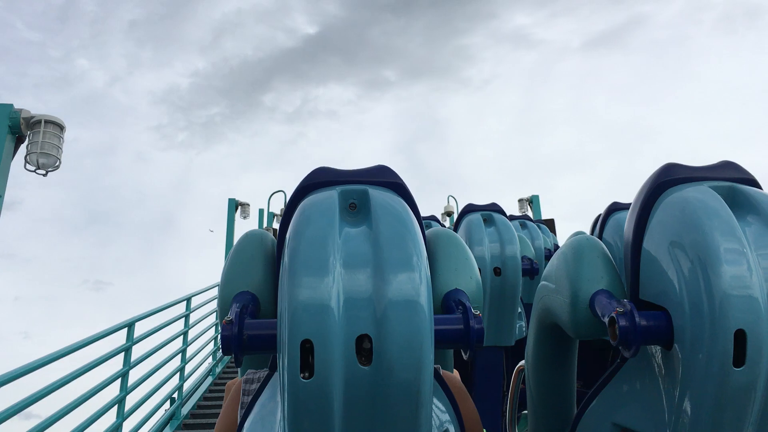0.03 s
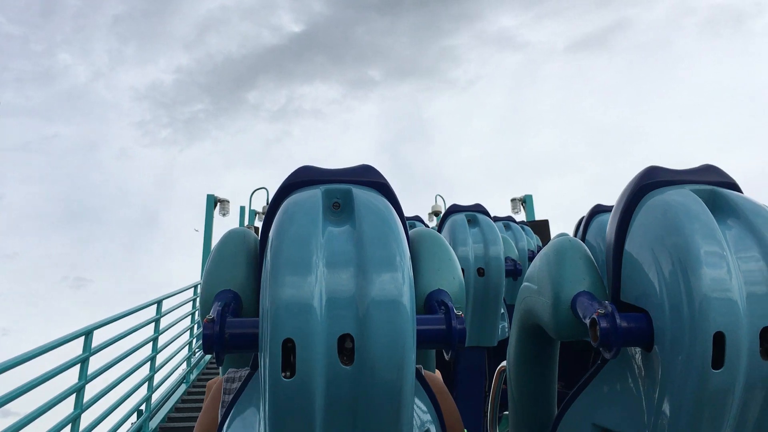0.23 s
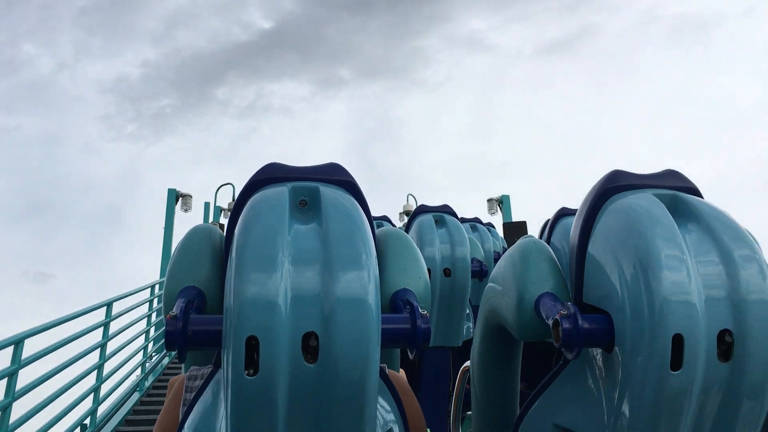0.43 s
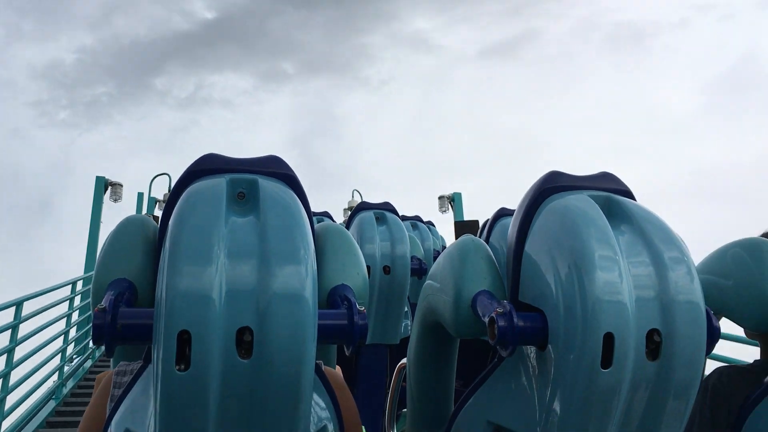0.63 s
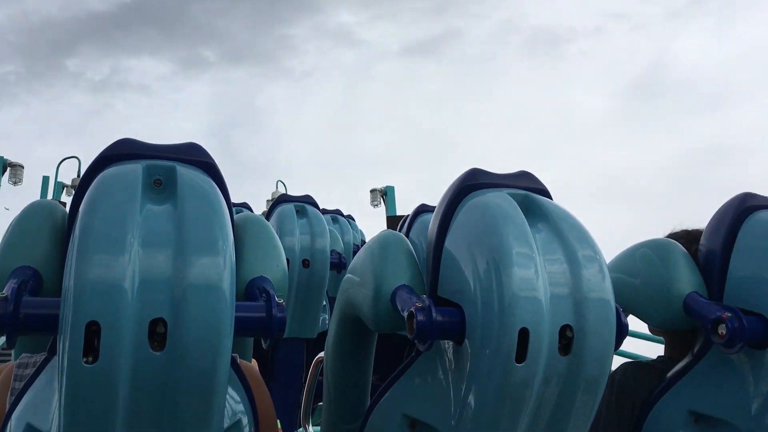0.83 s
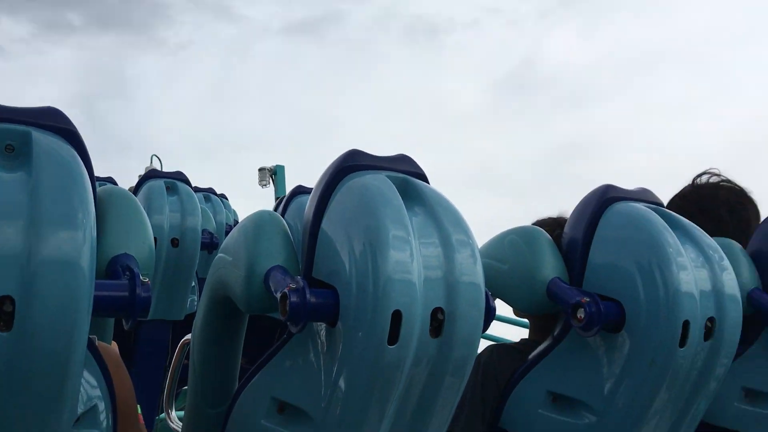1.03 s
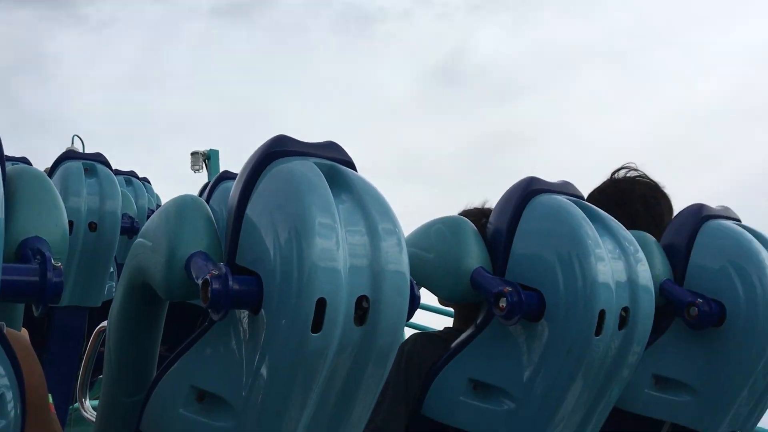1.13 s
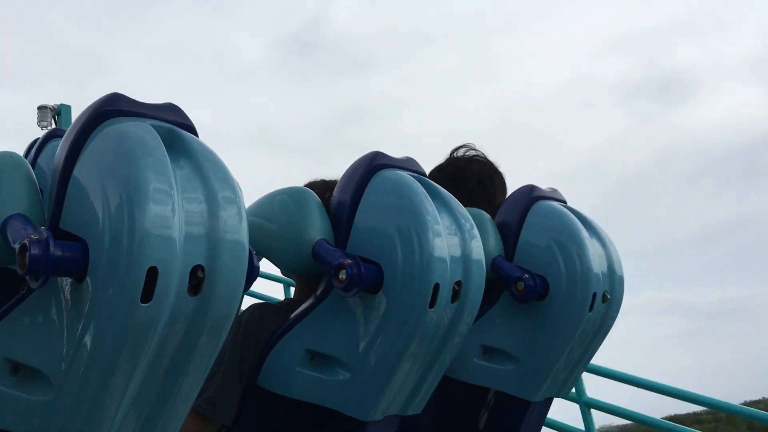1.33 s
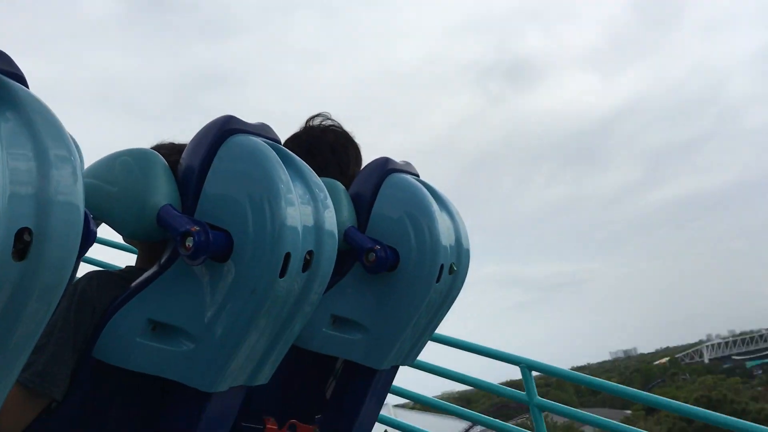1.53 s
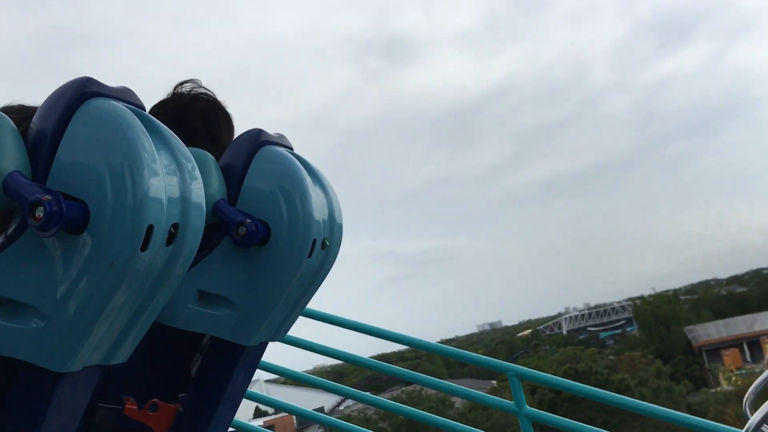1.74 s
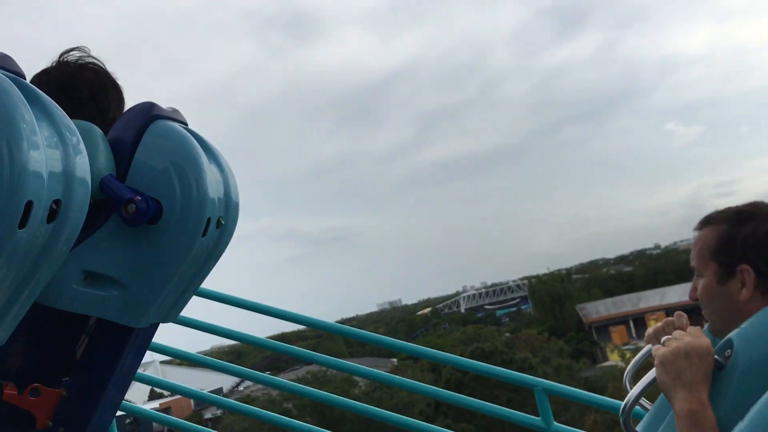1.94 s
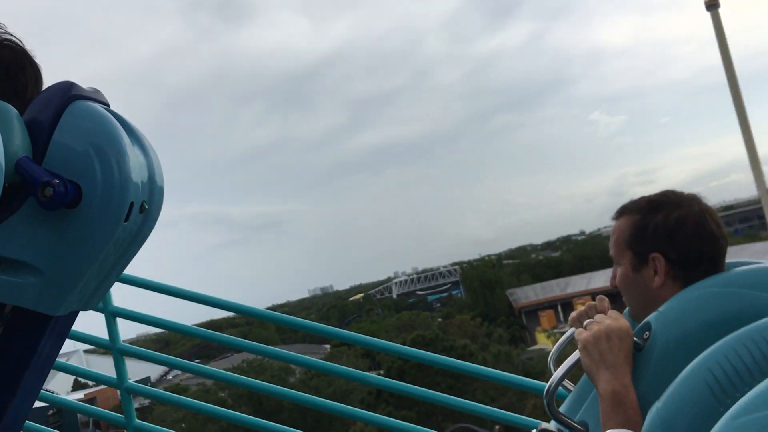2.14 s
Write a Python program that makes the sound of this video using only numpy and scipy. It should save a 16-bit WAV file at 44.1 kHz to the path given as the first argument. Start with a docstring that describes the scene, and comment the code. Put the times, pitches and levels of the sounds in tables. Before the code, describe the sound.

Roller coaster lift hill from a seat: clattering catches, gritty chain rumble, wind buffeting the microphone

```python
"""A coaster train climbs the lift hill, heard from a seat in the open air.
After a very short silence the chain grinds, a steady banded mix of gritty contacts and hiss ringing in the track,
while lumpy low noise and decaying sine puffs of wind buffet the microphone. About five times a second the catches
drop over the rack teeth in loose clusters of clacks: grit bursts that ring in the steel. From half a second on,
sharp decaying sine ticks and gliding sine groans poke through; at the end a bright noise scrape sets in."""
import sys
import numpy as np
from scipy import signal
from scipy.io import wavfile

SR = 44100
rng = np.random.default_rng(int(sys.argv[2]) if len(sys.argv) > 2 else 0)


def log_audio(samples):
    """Write samples as a 16-bit WAV file to the path given in sys.argv[1]."""
    # one column per channel
    frames = np.atleast_2d(samples).T
    # limit to full scale, then quantise
    limited = np.clip(frames, -1, 1)
    pcm = np.round(limited * 32767).astype(np.int16)
    wavfile.write(sys.argv[1], SR, pcm)


N = 97108
TIME_S = np.arange(N) / SR
EDGES_HZ = 20 * 2 ** np.arange(0, 9.8, 1 / 3)   # third octaves
CENTRES_HZ = np.sqrt(EDGES_HZ[1:] * EDGES_HZ[:-1])


def amp(db):
    """Decibels to an amplitude factor."""
    return 10 ** (np.asarray(db) / 20)


def rms_one(x):
    """Scale a signal to an rms of 1."""
    return x / np.sqrt(np.mean(x ** 2) + 1e-20)


def at_hz(points, hz):
    """Read a curve of (Hz, value) points along a logarithmic pitch axis."""
    points = np.array(points)
    return np.interp(np.log(hz), np.log(points[:, 0]), points[:, 1])


def drift(rate_hz):
    """Slow random wander of rms 1: noise through two equal low-pass poles, made at every 40th sample."""
    pole = np.exp(-2 * np.pi * rate_hz * 40 / SR)
    noise = rng.standard_normal(N // 40 + 1002)
    slow = signal.lfilter([1], [1, -2 * pole, pole * pole], noise)[1000:]   # skip the filter's start
    return np.interp(np.arange(N) / 40, np.arange(len(slow)), rms_one(slow))


def bands(spectrum, source):
    """Third-octave slices of two sources dealt in turn, weighted by the spectrum: (Hz, slice) pairs."""
    for k, hz in enumerate(CENTRES_HZ):
        if spectrum[0][0] < hz < spectrum[-1][0]:
            sos = signal.butter(2, EDGES_HZ[k:k + 2], "band", fs=SR, output="sos")
            yield hz, amp(at_hz(spectrum, hz)) * signal.sosfilt(sos, source[k % 2])


def white():
    """Two unrelated streams of smooth white noise."""
    return rng.standard_normal((2, N))


def resonance(x, hz, width_hz):
    """One ringing mode: a two-pole resonator whose width sets how fast it dies."""
    r = np.exp(-np.pi * width_hz / SR)
    feedback = [1, -2 * r * np.cos(2 * np.pi * hz / SR), r * r]
    return signal.lfilter(np.array([1, 0, -1]) * (1 - r * r) / 2, feedback, x)


# wind strength over time: time_s, level_db
WIND_LEVEL = [(.085, -35), (.13, -25.5), (.2, -31.5), (.3, -28), (.45, -28.5), (.57, -30.5), (.7, -27),
              (.84, -27), (.92, -23.5), (1.05, -41.5), (1.2, -35), (1.35, -32), (1.5, -30), (1.6, -37.5),
              (1.75, -41), (1.9, -36), (2.06, -27.5), (2.2, -37.5)]
# tone of the wind, relative density: pitch_hz, level_db_per_hz
WIND_TONE = [(12, -45), (20, -22), (65, 5), (166, -4), (229, -1.5), (414, -15.5), (467, -22.5), (500, 2),
             (650, -29), (1100, -120)]
# single puffs: start_s, level_db (before rise and decay), pitch_hz
PUFFS = [(0.238, -8.5, 82.5), (0.266, -23, 69), (0.322, -27, 165), (0.373, -12, 129), (0.413, -7, 98),
         (0.434, -6, 101), (0.461, -8.5, 144), (0.517, -13, 294), (0.596, -8.5, 92), (0.638, -4.5, 136),
         (0.663, -11, 166), (0.691, -9, 73.5), (0.698, -9.5, 148), (0.728, -7, 128), (0.796, -23, 75.4),
         (0.885, -25, 310), (0.894, -33, 88.8), (0.904, -7.5, 85), (0.998, -12, 70.0), (1.376, -7, 95),
         (1.403, -1.5, 80), (1.82, -3, 115), (1.83, -5.5, 78.1)]
WIND_LUMPY_DB, WIND_LUMPS_HZ = -2.5, 30.2
PUFF_T60_CYCLES, PUFF_RISE_CYCLES = 2.23, 0.2


def wind():
    """Air buffets the microphone port: lumpy low noise, with single puffs as short decaying sines."""
    noise = sum(part for hz, part in bands(WIND_TONE, white()))
    lumps = rms_one(amp(WIND_LUMPY_DB * drift(WIND_LUMPS_HZ)) * noise)
    time_s, level_db = np.transpose(WIND_LEVEL)
    out = amp(np.interp(TIME_S, time_s, level_db)) * lumps
    for start_s, level_db, pitch_hz in PUFFS:
        cycles = np.maximum(TIME_S - start_s, 0) * pitch_hz
        rise = np.minimum(cycles / PUFF_RISE_CYCLES, 1)
        decay = amp(-60 * cycles / PUFF_T60_CYCLES)
        out += amp(level_db) * np.sin(2 * np.pi * cycles) * rise * decay
    return out


GRAINS_PER_S, GRAIN_SPREAD_DB = 2500, 3
GRAIN_SHARE = 0.43   # part of the power; smooth noise makes up the rest


def grit():
    """Dense uneven metal contacts as random clicks, mixed with smooth noise."""
    size_db = GRAIN_SPREAD_DB * np.minimum(rng.exponential(1, (2, N)), 5)
    sizes = amp(size_db) * rng.choice([-1, 1], (2, N))
    grains = sizes * (rng.random((2, N)) < GRAINS_PER_S / SR)
    return np.sqrt(GRAIN_SHARE) * rms_one(grains) + np.sqrt(1 - GRAIN_SHARE) * white()


# modes of the steel track, relative levels: pitch_hz, width_hz, level_db
STEEL_MODES = [(356, 30, -8), (425, 30, -9), (855, 30, -7), (1060, 40, -8), (1225, 35, -8), (1570, 60, -7),
               (1730, 40, -9), (2090, 18, -6), (2550, 40, -8), (3330, 50, 1), (3430, 60, 3), (3580, 70, -2),
               (4230, 50, -6), (4670, 40, -4), (5730, 50, -5), (6900, 100, -6)]
STEADY_MODES_DB = -14.5   # trim of the modes under chain and scrape


def steel(x):
    """The track lifts its own modes out of whatever shakes it."""
    modes = (amp(level_db + STEADY_MODES_DB) * resonance(x, pitch_hz, width_hz)
             for pitch_hz, width_hz, level_db in STEEL_MODES)
    return x + sum(modes)


# tone of the chain, relative density before the track modes: pitch_hz, level_db_per_hz
CHAIN_TONE = [(88, -62), (150, 15), (290, -9.5), (412, 5.5), (551, -4.5), (1110, -1), (1800, -9.5),
              (2760, -24), (3490, -20.5), (13900, -44), (15600, -27)]
CHAIN_DB, CHAIN_PATCHY_DB = -30, 2.5


def chain():
    """Steady grind of chain and wheels through the track; the bands waver partly together, partly alone."""
    together = drift(2.8)
    shaken = [steel(x) for x in grit()]
    parts = (part * amp(CHAIN_PATCHY_DB * (together + drift(12))) for hz, part in bands(CHAIN_TONE, shaken))
    return amp(CHAIN_DB) * rms_one(sum(parts))


# gliding tones, level before swell and waver: start_s, length_s, pitch_hz, end_pitch_hz, level_db
GROAN_TONES = [(1.98, .1, 715, 750, -22), (2.03, .05, 390, 405, -22), (1.655, .05, 356, 356, -22),
               (1.27, .06, 1225, 1225, -26), (.878, .03, 450, 280, -17), (.922, .028, 520, 380, -20),
               (.515, .02, 360, 290, -21)]


def groans():
    """Narrow sine tones, wavering in pitch and level, under a smooth swell."""
    out = np.zeros(N)
    for start_s, length_s, pitch_hz, end_pitch_hz, level_db in GROAN_TONES:
        done = np.clip((TIME_S - start_s) / length_s, 0, 1)
        glide_hz = pitch_hz + (end_pitch_hz - pitch_hz) * done
        wavering_hz = glide_hz * (1 + 0.00653 * drift(16.8))
        swell = np.sin(np.pi * done) ** 1.5
        tone = np.sin(2 * np.pi * np.cumsum(wavering_hz) / SR)
        out += amp(level_db + 2.0 * drift(25)) * swell * tone
    return out


# tone of the scrape, relative density before the track modes: pitch_hz, level_db_per_hz
SCRAPE_TONE = [(1180, -35), (2000, 9.5), (2270, -4), (2970, -28), (3260, -2), (3650, 0), (4930, -15),
               (5190, -8.5), (7010, -7), (9060, -17.5), (15600, -21)]
SCRAPE_START_S, SCRAPE_RISE_S, SCRAPE_DB = 2.118, 0.009, -34
SCRAPE_PEAK_S, SCRAPE_SWELL_S, SCRAPE_SWELL_DB = 2.157, 0.017, 4.5


def scrape():
    """A bright scrape of smooth noise through the track that sets in, swells once and holds."""
    noise = rms_one(sum(part for hz, part in bands(SCRAPE_TONE, [steel(x) for x in white()])))
    rise = np.clip((TIME_S - SCRAPE_START_S) / SCRAPE_RISE_S, 0, 1)
    swell_db = SCRAPE_SWELL_DB * np.exp(-((TIME_S - SCRAPE_PEAK_S) / SCRAPE_SWELL_S) ** 2)
    return amp(SCRAPE_DB + swell_db) * rise * noise


# lone sharp ticks, level before decay: start_s, level_db, pitch_hz
TICK_KNOCKS = [(.504, -25, 7000), (.554, -28, 6300), (.687, -31, 6000), (.775, -34, 5500),
               (1.091, -29, 7800), (1.254, -27, 5500), (1.279, -33, 8500), (1.474, -27, 9500)]
TICK_T60_S = .005


def ticks():
    """Single small parts knock with a short high ring: sines that start at once and die."""
    out = np.zeros(N)
    for start_s, level_db, pitch_hz in TICK_KNOCKS:
        t = np.maximum(TIME_S - start_s, 0)
        out += amp(level_db - 60 * t / TICK_T60_S) * np.sin(2 * np.pi * pitch_hz * t)
    return out


# catches dropping over the teeth: start_s, level_db (at 3.5 kHz, before the overall trim),
# then over_db at 400 Hz, 800 Hz, 1.4 kHz, 2.3 kHz, 5.5 kHz, 10 kHz (relative to level_db),
# chatter_s, rise_s (before the extra attack cycles)
CLACK_HITS = [(0.084, -47.5, 18, 19.5, 27.5, 6, -3, -18, 0.059, 0.0045),
              (0.1205, -38, 14.5, 20.5, 19, 12, 7, 11.5, 0.012, 0.0057),
              (0.15, -40, 5, 19, 21, 12.5, -22, -16, 0.03, 0.0044),
              (0.1884, -40.5, 17, 3, 20.5, 8, -33, -26, 0.032, 0.004),
              (0.2844, -34.5, 15.5, 5, 18.5, 13.5, -16, -25, 0.013, 0.0052),
              (0.3214, -41, 12.5, 15.5, 24, 9, -9, -14, 0.018, 0.0048),
              (0.346, -41, 11, 6, 21.5, 11.5, -33, -32, 0.051, 0.0045),
              (0.4614, -34, 12.5, 11, 18, 12.5, 1.5, -7, 0.024, 0.004),
              (0.491, -35, 16.5, 19.5, 8, -20, 2, -24, 0.029, 0.004),
              (0.535, -37.5, 7, -1, 20.5, 1, -29, -28, 0.023, 0.004),
              (0.6236, -35, 12, 1, 2, 4, 0, -9, 0.032, 0.004),
              (0.6607, -32, 11, 10.5, 16, 7.5, -18, -41, 0.012, 0.0036),
              (0.71, -42.5, 17, 15.5, 22.5, -3, -33, -28, 0.038, 0.004),
              (0.755, -46, 7, 11, 14, 2, -21, -26, 0.014, 0.004),
              (0.8374, -37.5, 16, -6, 20, 8, 1, -17, 0.022, 0.004),
              (0.861, -29, 19, 11, 19.5, 5, -16, -30, 0.0069, 0.0049),
              (0.894, -42.5, 22.5, 25.5, 19, -16, -30, -11, 0.0097, 0.0053),
              (0.915, -56, 16, 10, 17, -3, -24, -22, 0.0094, 0.004),
              (1.0213, -30.5, 2, -24, 15, 3, 1.5, -19, 0.019, 0.0036),
              (1.045, -28, -16, 7.5, 9, -6, -5, -18, 0.027, 0.0037),
              (1.0844, -35.5, 17, 19, 21.5, -8, -45, -25, 0.014, 0.0053),
              (1.124, -40.5, 9, 19.5, 16, 12, -28, -28, 0.017, 0.004),
              (1.155, -51, 5, 4, 3, -1, -14, -17.5, 0.012, 0.0028),
              (1.216, -36.5, 7, 5, 11, -6, -3, -23, 0.035, 0.004),
              (1.2404, -33, 12, 18.5, 14.5, -3, -12, -24, 0.021, 0.0056),
              (1.2714, -38, 19, 17, 22.5, -1, -13, 4.5, 0.029, 0.0036),
              (1.317, -46, 0, 5, 10, -7, -31, -21, 0.0078, 0.004),
              (1.4255, -28.5, -9, -4, 8, -3, -2, -6, 0.015, 0.0037),
              (1.4367, -31.5, 9, 7, 12.5, 2, 3, -11, 0.026, 0.0056),
              (1.467, -33.5, 9.5, 17.5, 15.5, -2.5, -14, -14, 0.03, 0.004),
              (1.5174, -40.5, -13, 9, 20.5, -32, -26, -22, 0.027, 0.004),
              (1.605, -35.5, 6, -6, -12, 3, -9, -22, 0.018, 0.0048),
              (1.614, -34, 14.5, 11.5, 10, -18, -6, -15, 0.021, 0.004),
              (1.64, -33.5, 16.5, 13.5, 15.5, 3.5, 2, -1, 0.035, 0.004),
              (1.672, -31, 6, 11, -3, 5, -1, -27, 0.03, 0.0024),
              (1.718, -34, 10, 9, 7, -4, -21, -23, 0.011, 0.0034),
              (1.796, -38.5, 13, 11, 4, 3, -5, -13, 0.03, 0.0048),
              (1.825, -33.5, 10.5, 16, 7, 4, -1.5, -4, 0.012, 0.0044),
              (1.853, -44, -3, 14, -2, 4, -5, -17, 0.034, 0.0027),
              (2.0024, -41.5, 25.5, 21.5, 3, 3, -20, -22, 0.03, 0.004),
              (2.022, -28, 6, 11, 8, 3.5, -6, -8.5, 0.018, 0.0054),
              (2.0457, -26, 9.5, 10, 2, 1.5, -33, -26, 0.0092, 0.004),
              (2.06, -34, -1, -10, -12, -12, -22, -23, 0.02, 0.004)]
# pitches of level_db and the over_db columns, in that order: pitch_hz
CLACK_PITCHES = [3500, 400, 800, 1400, 2300, 5500, 10000]
# shape of the clack tone between those pitches: pitch_hz, level_db_per_hz
CLACK_TONE = [(120, -12), (200, -3), (400, 0), (560, -4), (850, 0), (1300, -1), (1700, -3), (2300, -10),
              (2900, -20), (3450, -14), (4200, -20), (5500, -24), (10000, -33), (12500, -37), (15700, -45)]
# dying of the clacks: pitch_hz, t60_s
CLACK_RING = [(200, .25), (1300, 0.42), (4000, 0.067), (15000, 0.04)]
CLACK_DB, ATTACK_CYCLES = -13, 4.4   # overall trim; cycles added to each rise
CHATTER_DB, CHATTER_HZ = 2.5, 60   # unevenness inside a clack
MODE_SPREAD_DB = 1.5   # each clack strikes each mode differently


def clacks():
    """Each clack chatters for its length, then dies band by band, mostly treble first, ringing in the steel."""
    start_s, level_db, *over_db, chatter_s, rise_s = np.transpose(CLACK_HITS)
    order = np.argsort(CLACK_PITCHES)
    anchors_hz = np.array(CLACK_PITCHES)[order]
    anchor_db = (level_db + np.array([0 * level_db, *over_db]))[order].T
    # take out the tone shape and band width that strokes() puts back
    offsets_db = anchor_db - at_hz(CLACK_TONE, anchors_hz) - 10 * np.log10(anchors_hz)
    steps = np.arange(0, N, 32)   # coarse envelope points
    t = steps / SR - start_s[:, None]
    ringing_s = np.maximum(t - chatter_s[:, None], 0)

    def strokes(hz, spread_db):
        """Envelope of all clacks at one pitch, their powers added."""
        hit_db = np.array([at_hz(np.transpose([anchors_hz, row]), hz) for row in offsets_db])
        hit_db = hit_db + spread_db * rng.standard_normal(len(start_s))
        rise = np.clip(t / (rise_s[:, None] + ATTACK_CYCLES / hz), 0, 1)
        power = (rise * amp(hit_db[:, None] - 60 * ringing_s / at_hz(CLACK_RING, hz))) ** 2
        gain = amp(at_hz(CLACK_TONE, hz)) * np.sqrt(hz * power.sum(0))   # band width grows with hz
        return np.interp(np.arange(N), steps, gain)

    contacts = grit()
    broad = sum(rms_one(part) * strokes(hz, 0) * amp(CHATTER_DB * drift(CHATTER_HZ))
                for hz, part in bands(CLACK_TONE, contacts))
    modes = sum(amp(mode_db) * rms_one(resonance(contacts[0], hz, width_hz)) * strokes(hz, MODE_SPREAD_DB)
                for hz, width_hz, mode_db in STEEL_MODES)
    return amp(CLACK_DB) * (broad + modes)


def scene():
    """All sources added into one channel, background first."""
    return (wind() + chain() + groans() + scrape() + ticks() + clacks())[None]


# microphone peaks and dips: pitch_hz, width_hz, share_added (a ratio; negative dips)
MIC_PEAKS = [(9100, 1200, 0.3), (10330, 700, -0.5), (7450, 720, -0.16), (15500, 2500, -0.37)]
MIC_LOW_HZ, CUTOFF_HZ = 44.6, 15720
START_S, START_RISE_S = .0845, 0.00037   # silence before


def record(dry):
    """The microphone thins deep bass and colours treble; sound cuts in after a silence, the top is cut."""
    out = signal.sosfilt(signal.butter(3, MIC_LOW_HZ, "high", fs=SR, output="sos"), dry)
    for pitch_hz, width_hz, share_added in MIC_PEAKS:
        out = out + share_added * resonance(out, pitch_hz, width_hz)
    gate = np.clip((TIME_S - START_S) / START_RISE_S, 0, 1)
    top_cut = signal.ellip(14, .5, 100, CUTOFF_HZ, fs=SR, output="sos")
    return signal.sosfilt(top_cut, out * gate)


dry = scene()
out = record(dry)
log_audio(out)
```